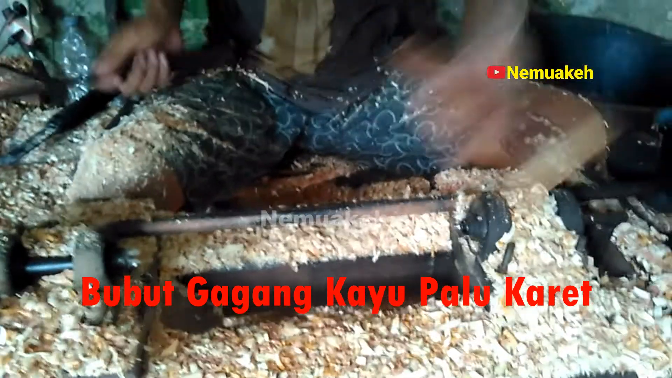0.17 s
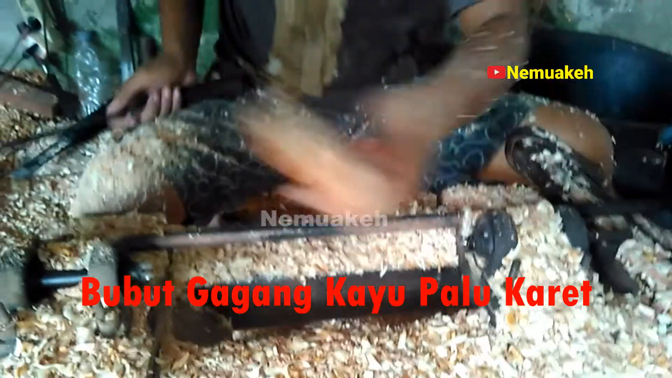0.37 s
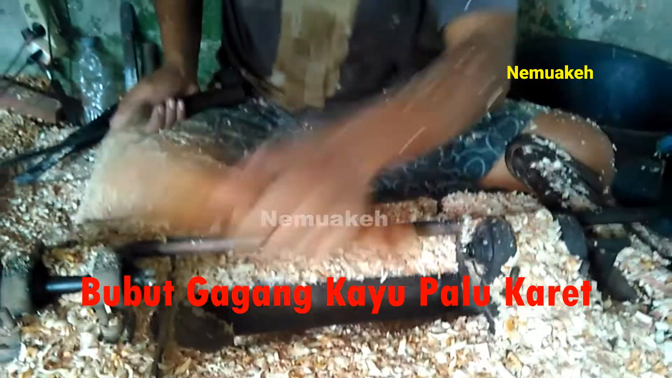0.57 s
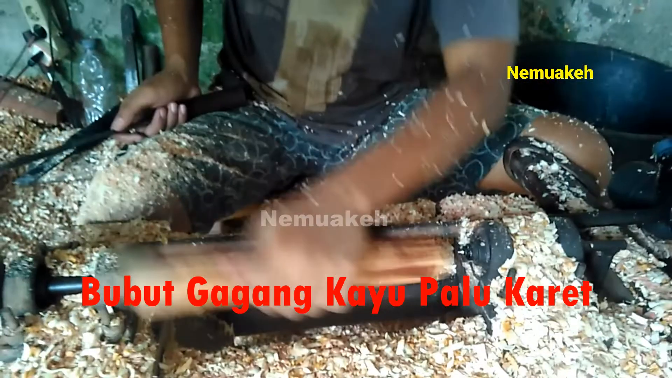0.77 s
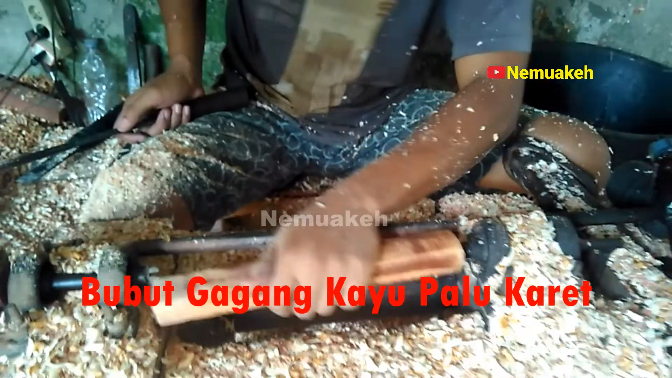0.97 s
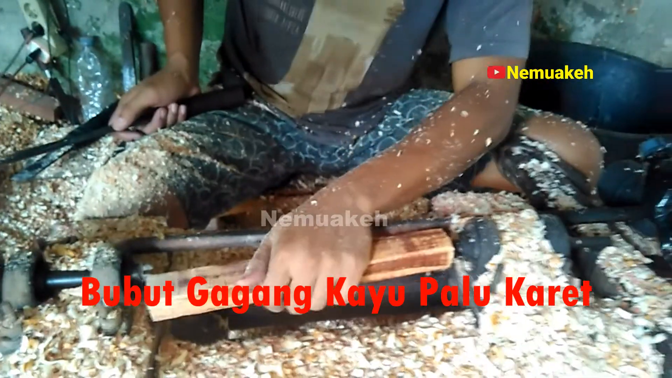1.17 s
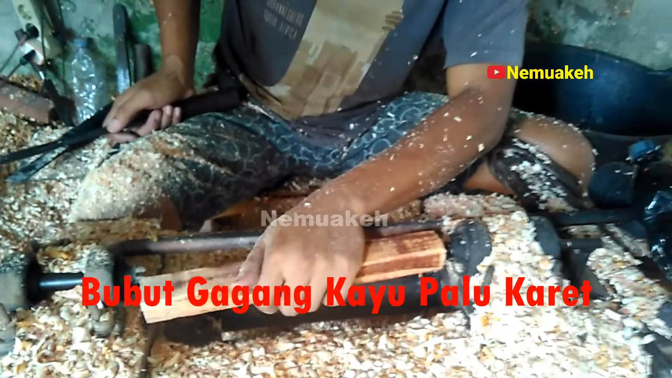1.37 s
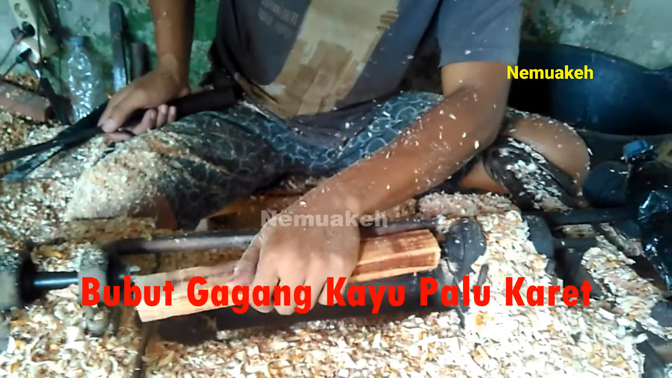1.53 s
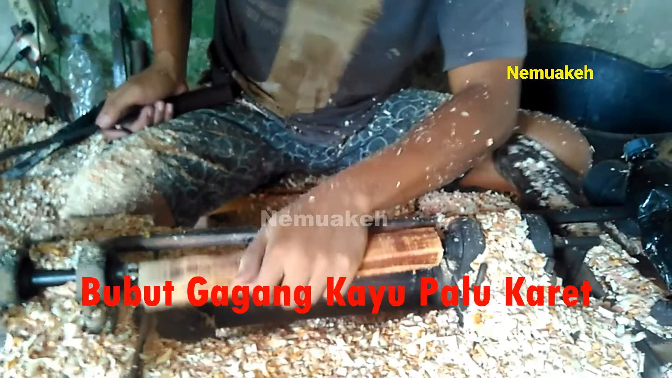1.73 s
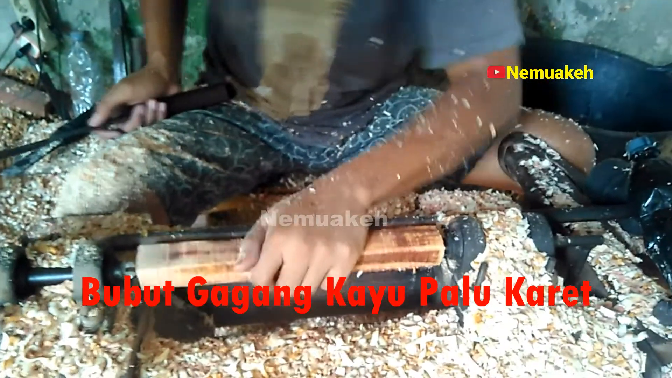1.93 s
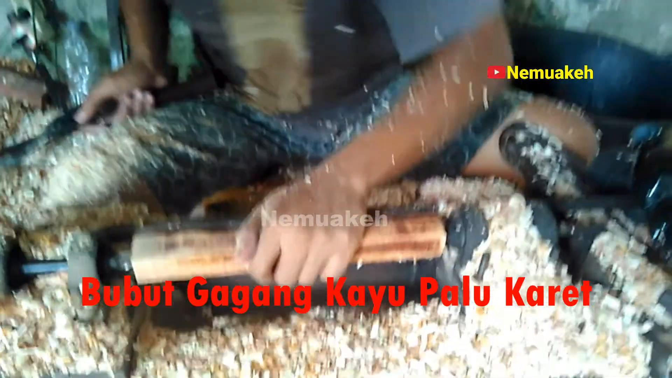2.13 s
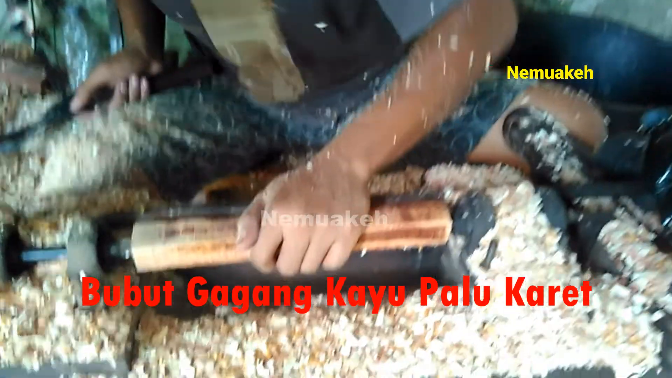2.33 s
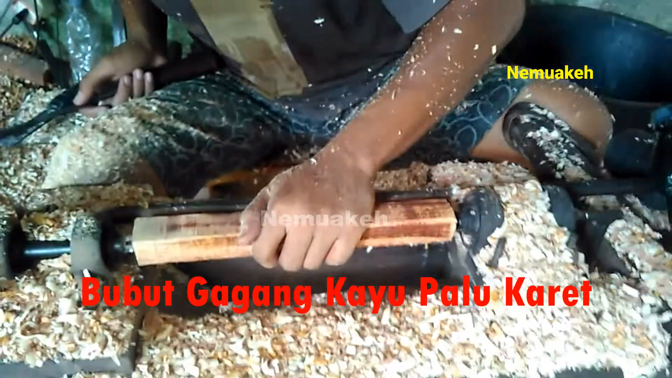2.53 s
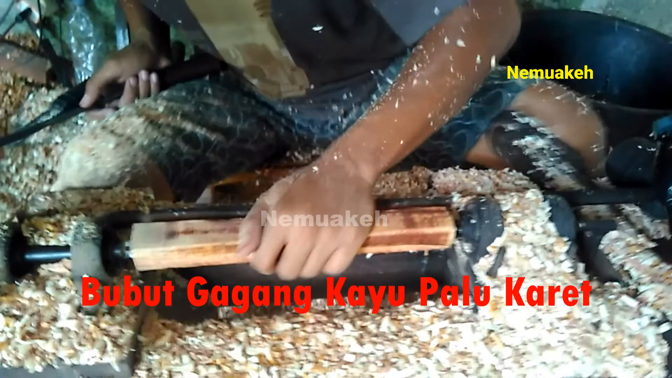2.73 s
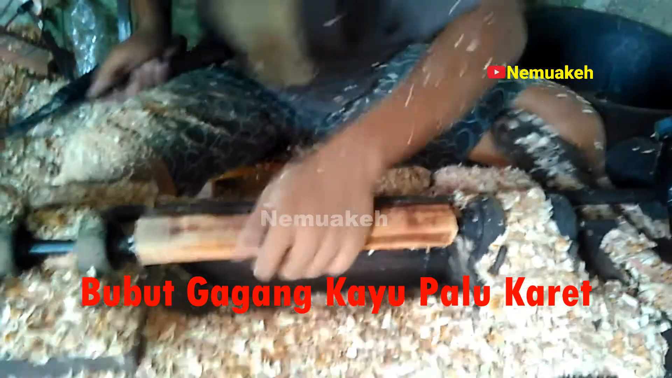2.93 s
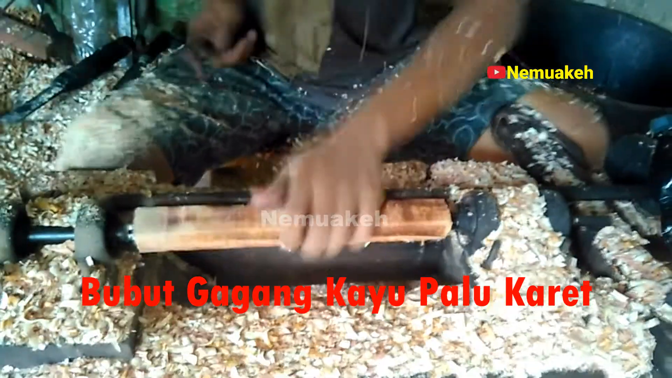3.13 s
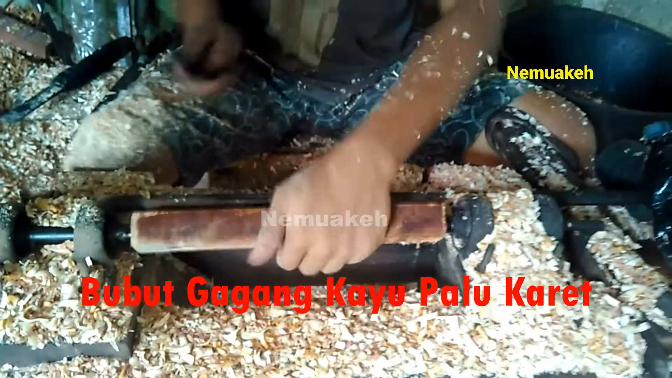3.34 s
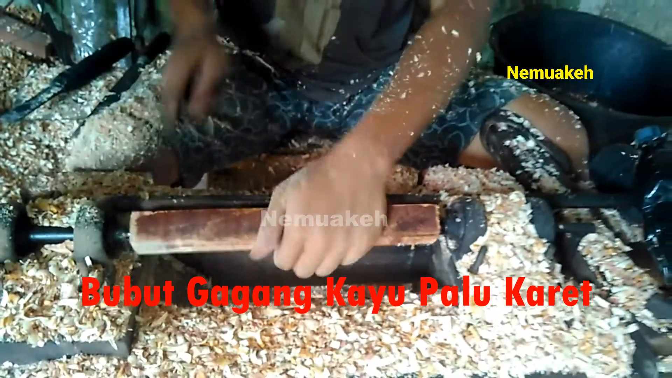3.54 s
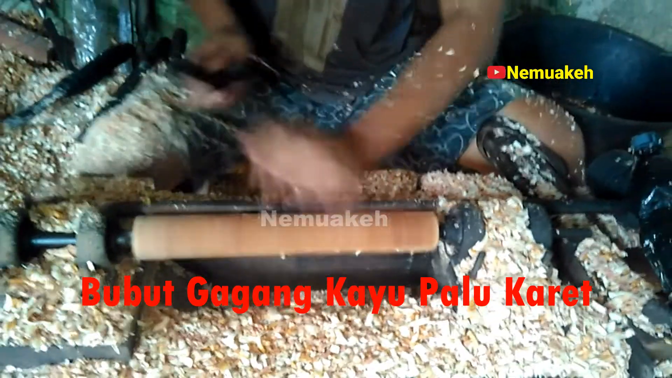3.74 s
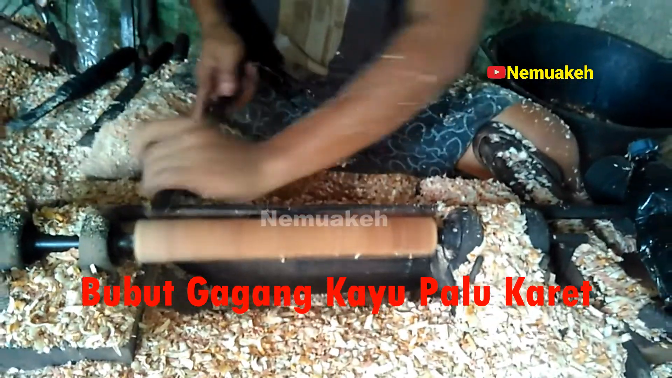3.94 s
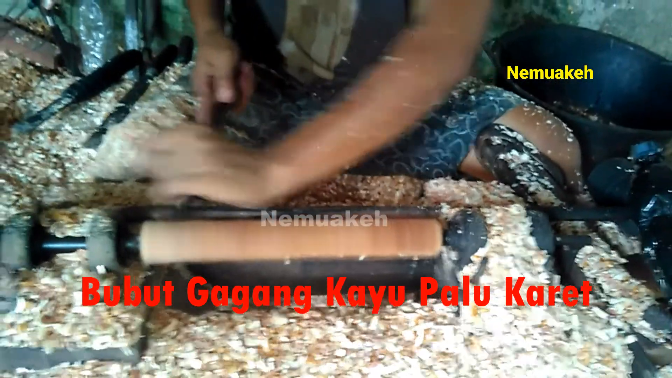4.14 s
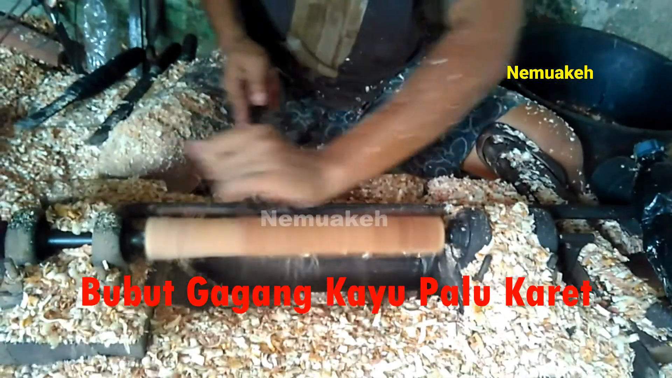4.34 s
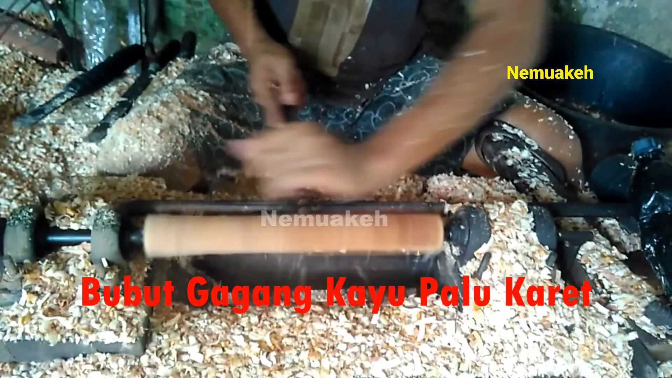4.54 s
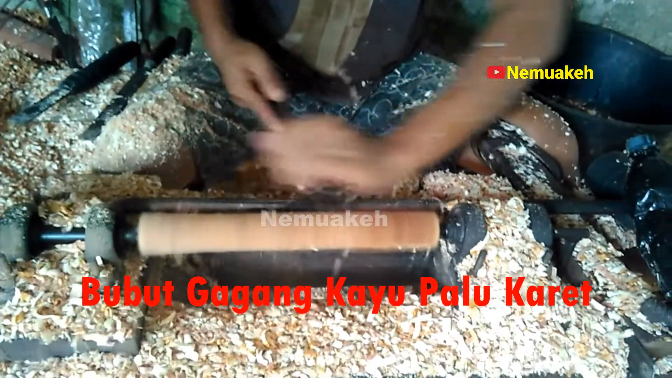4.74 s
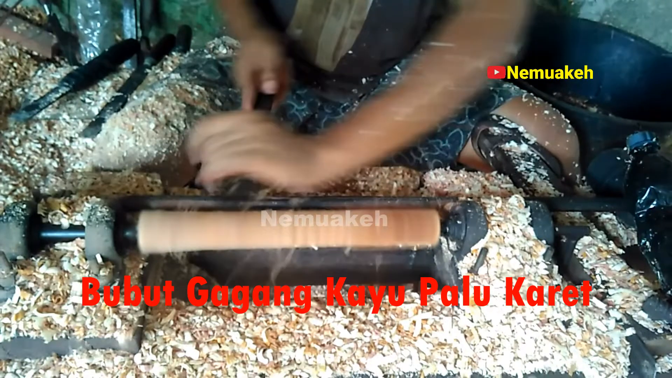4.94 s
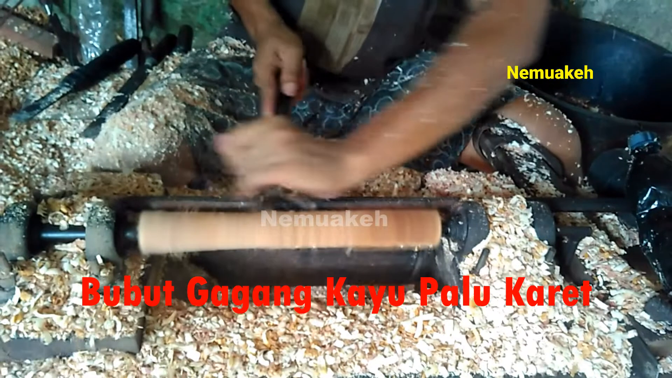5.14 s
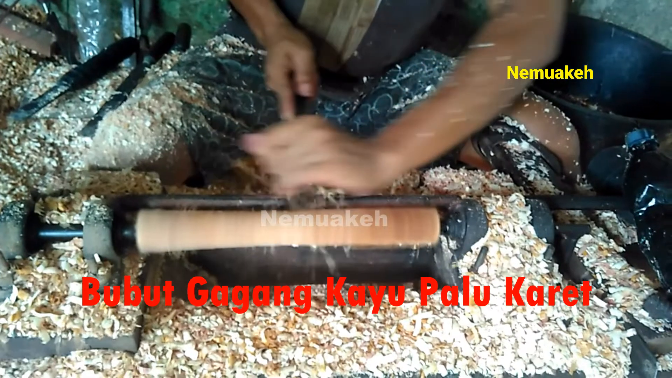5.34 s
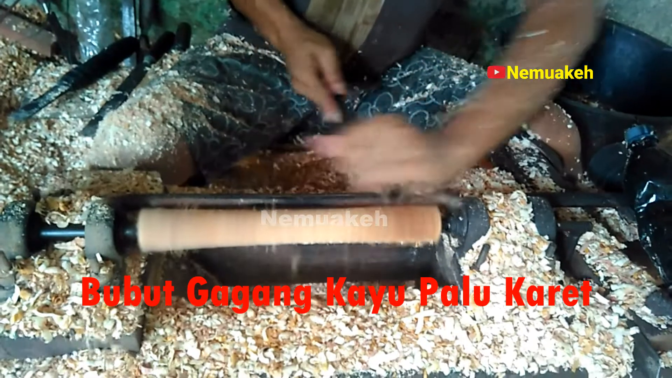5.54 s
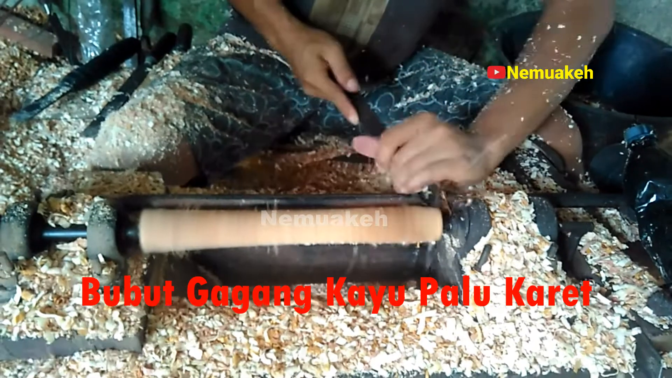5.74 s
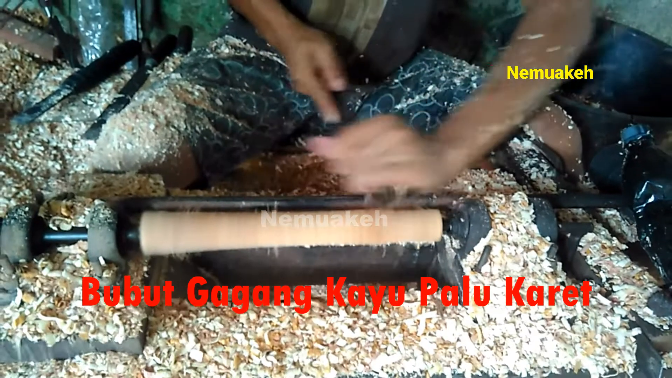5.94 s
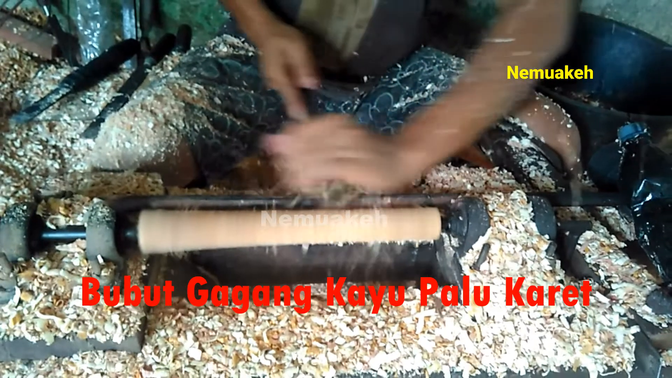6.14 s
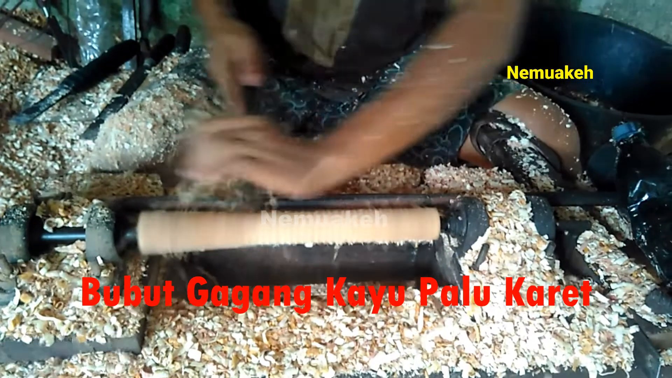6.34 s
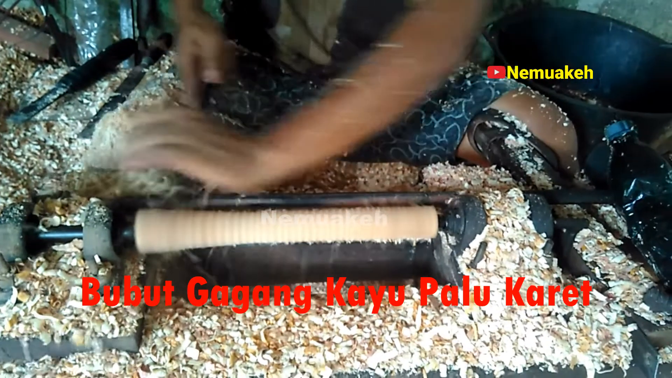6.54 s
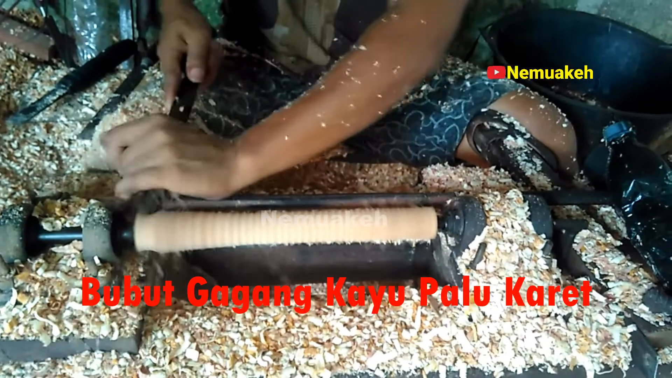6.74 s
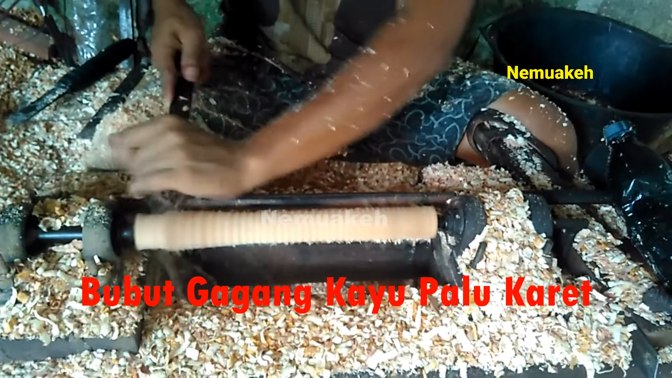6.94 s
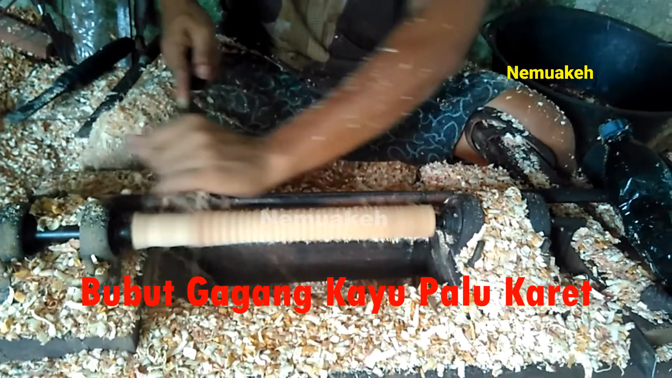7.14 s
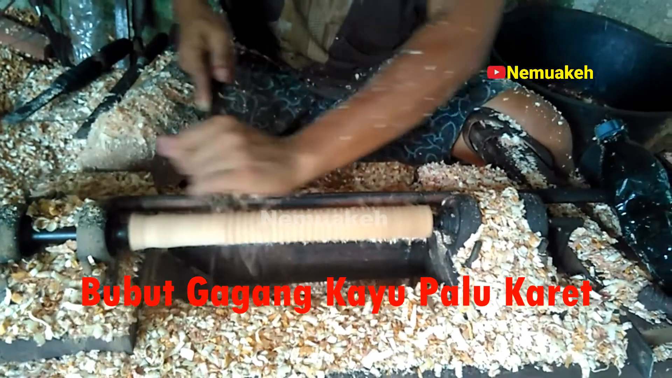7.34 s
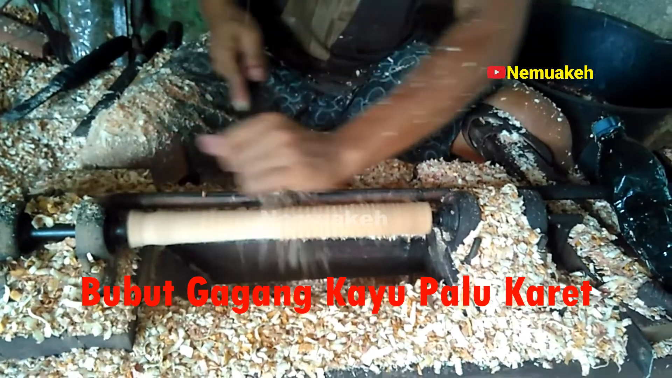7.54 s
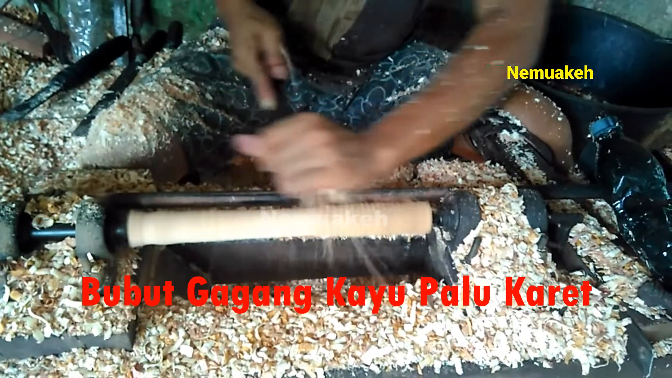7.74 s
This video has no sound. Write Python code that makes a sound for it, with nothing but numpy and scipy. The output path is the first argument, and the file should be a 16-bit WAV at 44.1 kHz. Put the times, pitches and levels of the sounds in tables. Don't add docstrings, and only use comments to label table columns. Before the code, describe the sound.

A small open workshop, miked close, with faint birds in the yard. In the first half second a distant cock crows, low then breaking higher, over a low throb and rustling shavings; small clicks lead to a solid wooden knock at 0.57 s. Until about 2.7 s rising whistles and falling chirps continue among soft taps and ticks. Rustling grows near 3.1 s, a short squeak climbs and drops around 3.3-3.45 s, and hard clacks land at 3.57 s. The motor whirrs up from 3.7 s. At 4.0 s steel touches the wood with a crack, and from 4.17 s a very loud, distorted tearing screech begins. It eases to a rough skim near 4.75 s, bites again at 4.85 and 5.12 s, then runs on with shifting shrill metallic tones. After a brief lighter skim at 6.65-6.75 s and rapid catches, a final stroke grinds from 6.77 s to the end at 8 s.

```python
import sys
import numpy as np
from scipy import signal
from scipy.fft import rfft, irfft, next_fast_len
from scipy.io import wavfile
from scipy.ndimage import uniform_filter1d, map_coordinates

SR = 44100
rng = np.random.default_rng(int(sys.argv[2]) if len(sys.argv) > 2 else 0)


def to_wav(s):
    ch = np.atleast_2d(s).T
    pcm = np.round(np.clip(ch, -1, 1) * 32767)
    wavfile.write(sys.argv[1], SR, pcm.astype(np.int16))


def volts(x):
    e = np.asarray(x, float) / 20
    return 10 ** e


N = 348390
TIME_S = np.arange(N) / SR

# pitch_hz, width_hz, level_db
STEEL = [(4265, 30, -6), (4786, 55, -8), (5163, 35, -11), (5697, 55, -7), (6122, 35, -7), (6675, 45, 0),
         (7170, 30, -9), (7711, 28, -3), (8260, 45, -7), (8820, 45, -5), (9428, 28, -4), (9980, 35, -6),
         (10623, 30, -7), (11205, 35, -6)]
# pitch_hz, width_hz, level_db
REST = [(2640, 70, -14), (3310, 60, -13), (3700, 60, -7), (3990, 50, -14)]
LEAD_DB = {4260: -21.5, 6680: -17}
# centre_s, length_s, pitch_hz, boost_db
SINGS = [(4.2, 0.28, 4786, 9), (5.8, 0.11, 4265, 12), (5.537, 0.073, 4265, 6), (6.072, 0.11, 4265, 5),
         (6.65, 0.078, 4265, 14), (7.046, 0.16, 4265, 12), (4.178, .04, 6675, 17.5),
         (4.462, 0.13, 6675, 17), (4.64, 0.084, 6675, 13), (4.96, 0.11, 6675, 7), (5.174, 0.09, 6675, 8),
         (5.398, 0.13, 6675, 9.5), (5.2, 0.14, 6675, 11), (5.844, 0.12, 6675, 17), (6.786, 0.14, 6675, 12),
         (6.97, 0.086, 6675, 11.5), (5.9, 0.12, 6675, 10), (6.9, 0.11, 6675, 12.5),
         (4.398, 0.11, 7711, 14.5), (4.73, 0.082, 7711, -1), (5.17, 0.065, 7711, 11), (5.1, .1, 7711, 8),
         (5.965, 0.05, 7711, 8), (6.83, 0.044, 7711, 19), (3.6, .1, 8820, 8), (6.58, 0.081, 8820, 14),
         (7.5, 0.24, 9428, 5.5), (6.7, 0.53, 8260, 11), (4.7, .06, 10623, 12), (6.63, 0.12, 10623, 12),
         (6.66, 0.069, 9980, 12), (6.56, 0.17, 11205, 4), (6.66, .06, 8260, 0), (4.7, .1, 9428, 10),
         (6, .1, 8820, 7), (3.1, .06, 8820, 11), (5.72, .06, 8260, 12), (5.71, .08, 9980, 8),
         (5.7, 0.13, 11205, 6), (4.95, 0.12, 11205, 7), (4.72, .1, 5697, 4.5), (4.74, .1, 6122, 8),
         (4.37, .1, 4786, 13), (5.85, 0.21, 4786, 9.5), (5, .1, 5697, 19), (6.85, 0.051, 8820, 10),
         (6.4, .12, 11205, 5.5), (4.97, 0.051, 7711, 7), (6.05, 0.053, 11205, 4), (6.26, .1, 10623, 7)]
# centre_s, length_s, pitch_hz, lost_share
DEAD = [(4.402, .12, 3080, .7), (4.62, 0.19, 3070, .8), (4.904, 0.12, 3030, 1), (5.277, 0.17, 3300, 0.98),
        (5.695, .1, 3300, 0.79), (6.63, .15, 3070, .9), (6.954, 0.27, 3080, .75),
        (7.197, 0.099, 3060, 0.76), (7.5, 0.15, 3080, 0.98), (4.653, 0.42, 4560, 0.85),
        (5.0, .08, 4540, 0.66), (5.33, 0.21, 4500, 0.74), (6.01, .1, 4530, 0.79), (6.6, 0.21, 4550, 0.77),
        (6.951, .3, 4520, 0.37), (4.636, 0.17, 5330, 0.9), (4.8, 0.06, 5370, 1), (5.724, 0.14, 5350, 1),
        (6.904, 0.096, 5320, .6), (7.333, 0.16, 5330, 0.7)]
# time_s, wood_body_db, steel_singing_db
GRIP = [(3.6, -6, -3.5), (4.0, -13, 3), (4.25, -3.5, 0.5), (4.4, -6, -1), (4.52, -12.5, -2),
        (4.7, -11.5, .5), (5.0, -11.5, 0), (5.3, -10.5, -0.5), (5.52, -13.5, -0.5), (5.72, -9, 1),
        (5.95, -11, .5), (6.15, -12.5, -0.5), (6.47, -10.5, -3.5), (6.64, -13.5, -1), (6.85, -8, -2),
        (7.1, -8, -0.5), (7.5, -10, -1.5), (7.9, -6, -3)]
# pitch_hz, density_db
CHIPS = [(120, -16.0), (410, -8.0), (700, -7), (1580, -11.5), (1920, -10.0), (2690, -6.0), (3020, -5.5),
         (3720, -3.0), (4340, -7.0), (4510, -3.0), (4750, -2.5), (9690, -2), (13600, -9.5), (15400, -24)]
# pitch_hz, likeness (-1 to 1)
CUT_ALIKE = [(60, -0.51), (180, -0.25), (550, -0.71), (1650, -0.21), (4970, -0.017), (15000, -0.23)]
# pitch_hz, left_minus_right_db
CUT_BALANCE = [(500, 3.5), (1500, 0), (3000, -2), (6000, -1), (9000, 4), (13000, 4)]
# pitch_hz, width_hz, level_db
TURNING_WOOD = [(1590, 470, -4.5), (2653, 260, -4), (3860, 600, 0.5)]
BITES_S = [4.005, 4.168, 4.846, 5.119, 6.77]
# length_s, bite_cut_db, lift_cut_db, lift_db_per_s
STROKES = [
    (.007, -6.5, -11.5, 243.5),
    (0.55, -12, -7, 121),
    (0.15, -8, -6.5, 263),
    (1.529, -8.5, -8.5, 205),
    (1.23, -10, -7, 206),
]
# centre_s, length_s, dip_db
SLACKS = [(4.237, 0.21, -0.5), (5.755, .055, 2), (5.847, 0.06, 6.5), (6.776, 0.018, 0)]
# time_s, level_db
MOTOR = [
    (3.69, -62),
    (3.72, -42.5),
    (3.99, -36.5),
    (4.03, -28.5),
    (4.2, -24),
    (7.9, -28.5),
]
# pitch_hz, density_db
BED = [(35, -35), (60, 4.5), (164, -9.5), (478, -8.5), (615, 4), (1280, -4.5), (1760, -7), (4180, -1.5),
       (6300, -23), (10900, -6.5), (14000, -58)]
# pitch_hz, width_hz, level_db
BEARING = [(800, 330, -3), (1377, 260, 1.5), (2547, 220, -4)]
# start_s, peak_db, wood_db, t60_s, left_minus_right_db
KNOCKS = [(0.281, -35, -45, .025, 10), (0.343, -31, -45, .025, 14), (0.4544, -28, -45, 0.06, 7),
          (0.5675, -29, -2, 0.028, 9), (0.571, -9, -17, 0.11, 5), (0.8128, -44, 10, 0.15, 6),
          (0.9485, -45, -5, 0.23, 5), (1.2414, -42, -45, .04, 6.0), (1.7285, -34, -24, 0.13, 2),
          (2.2388, -35.5, -24, 0.05, 3), (2.299, -33.5, -26, 0.069, 6), (2.3305, -27, -36, 0.029, 5),
          (1.755, -35, -45, .03, 7), (2.58, -55, 9, 0.18, 3), (2.772, -46, -25, .04, 6),
          (3.06, -41, -6, .04, 7), (3.215, -40, -45, .03, 6), (3.0894, -27.5, -22, 6.0, 6),
          (3.44, -47, -1, 0.11, -1), (3.572, -21, -8, 0.045, 1), (3.5748, -7, -13, 0.035, 10),
          (3.577, 0, -11.5, 0.11, 4), (4.0044, -3.5, -24, 0.12, 8), (4.1682, -7, -11.5, 0.027, 1),
          (4.075, -5, -23, 0.033, 7), (5.08, -12, -25, .02, 2), (6.701, -10, -29, .02, 2),
          (4.15, -10, -29, .03, 2), (4.829, 7.5, -40, 0.042, 6)]
# start_s, peak_db, wood_db, t60_s, left_minus_right_db
CATCHES = [
    (6.719, -4, -25, .02, 2),
    (6.734, 3, -25, .02, 2),
    (6.751, 3, -25, .035, 2),
]
# pitch_hz, width_hz, level_db
BLANK = [(206, 350, -4), (457, 230, 4.5), (713, 150, 8.5), (1090, 690, 0), (1610, 310, 1), (2320, 600, -17),
         (3300, 660, -14)]
# start_s, pitch_hz, level_db, t60_s
RINGS = [(0.571, 1020, -31, 0.075), (.5715, 1230, -29, 0.065), (0.8131, 725, -33.5, 0.081),
         (.8135, 2400, -47, 0.034), (.8135, 3440, -49, .04), (0.814, 639, -39, .08), (.949, 800, -52, .08),
         (.5715, 2570, -36, 0.076), (.5715, 3410, -38, .06), (.5715, 7800, -35, .1),
         (.5715, 11210, -28, 0.098), (3.578, 9200, -23, 0.15), (3.578, 10340, -25, 0.13),
         (3.578, 5150, -23.5, .1), (3.5773, 3230, -27, 0.063)]
# time_s, slip_hz, level_db, octave_db
SQUEAK = [
    (3.29, 758, -70, 12),
    (3.305, 798, -48.5, 3.5),
    (3.35, 986, -40.5, -6),
    (3.357, 1310, -39, -11),
    (3.385, 1280, -33.5, -17),
    (3.39, 980, -52, 6),
    (3.42, 824, -42, -1.5),
    (3.445, 666, -54, 7),
    (3.46, 680, -75, 0),
]
# start_s, length_s, pitch_hz, slide_hz, level_db
WHISTLER = [
    (0.284, 0.34, 2332, 241, -52.5),
    (1.049, 0.28, 2307, 192, -53.5),
    (1.871, 0.29, 2290, 238, -53.5),
    (2.329, 0.116, 2400, -150, -60),
    (2.605, 0.14, 2306, -14, -62),
]
# start_s, length_s, start_hz, end_hz, level_db
TRILLS = [(0.818, 0.26, 5590, 3310, -56.5), (.935, .035, 5750, 5700, -61), (1.057, 0.058, 3450, 3150, -58),
          (1.275, 0.094, 3080, 2970, -60), (1.262, .07, 3900, 3530, -61), (1.497, 0.087, 2980, 2766, -60),
          (1.744, 0.077, 3020, 3005, -56), (2.97, .08, 5250, 5150, -68), (0.294, .12, 5200, 5070, -67),
          (1.192, 0.12, 4150, 3050, -59), (1.406, 0.12, 4400, 3000, -61.5), (1.603, 0.093, 4570, 4260, -63),
          (1.7, 0.056, 3520, 3060, -62), (1.837, 0.062, 2800, 2660, -59), (2.043, .08, 5230, 4900, -73),
          (2.116, 0.044, 3820, 3500, -58), (2.197, 0.097, 4830, 4400, -65), (2.535, .1, 5400, 5080, -64),
          (2.605, 0.062, 4190, 3520, -59), (2.73, 0.07, 4660, 4660, -63)]
# time_s, level_db
AIR = [(0, -44), (.35, -40.5), (1.1, -42.5), (1.5, -48.5), (2.1, -55.5), (2.5, -50), (3.1, -49),
       (3.55, -50), (3.95, -36)]
# centre_s, dip_db
LULLS = [(.17, 22), (.57, 8), (.78, 18), (.97, 12), (1.25, 15), (1.7, 11), (1.9, 6), (2.33, 9), (2.69, 24),
         (2.8, 8), (3.32, 8), (3.63, 13)]
# pitch_hz, density_db
THROB = [(12, -58), (20, -35), (30, -6), (54, 13), (67, 1), (81, -18), (130, -31), (170, -52), (290, -120)]
# peak_s, peak_db
RUSTLE = [(0, -40.5), (.07, -46.5), (.5, -42.5), (1.0, -49), (1.81, -47.5), (2.775, -55), (2.85, -39),
          (3.095, -33.5), (3.17, -33.5), (3.36, -40)]
# pitch_hz, density_db
SHAVINGS = [(470, -42), (800, 0), (914, -3), (1010, -7), (2460, -3.5), (5380, -2), (7190, -2.5),
            (10600, 7.5), (14300, -6.5)]
# pitch_hz, density_db
YARD = [(59, -28), (100, 6), (271, -9), (798, -15), (1430, -26.5), (2300, -23), (2770, -52), (3080, -21),
        (4560, -74), (10300, -43.5), (14300, -23)]
# pitch_hz, likeness (-1 to 1)
ALIKE = [(60, -0.97), (180, -0.81), (550, -0.62), (1650, 0.26), (4970, 0.17), (15000, -0.21)]
# pitch_hz, level_db
WHINE = [(13001, -80), (14002, -75)]
# pitch_hz, width_hz, level_db
SCUFF = [(1280, 370, 0.17), (6800, 330, 1.8)]
# pitch_hz, t60_s
SHED = [(200, 0.3), (2000, 0.27), (10000, 0.11)]
# pitch_hz, ease_db
EASE = [(1200, -60), (1700, -5), (2400, 0), (6500, 0), (8000, -3), (11000, -3), (12500, 0)]

SHAFT_HZ, TOUCH_S = 53.66, 4.005
START_S, START_DB, RUN_UP_DB_PER_S = 3.7, -49.5, 68
SKIM_DB, SKIM_SPAN_DB, SKIP_DB = -21.5, 3.2, 2.5
CROW_S, CROW_BREAK_S, CROW_END_S = 0.091, 0.17, 0.43
CROW_HZ, CROW_SCOOP_HZ, CROW_SCOOP_S, CROW_LOW_DB, CROW_HIGH_DB = 730, 121, .03, -54, -51
WHISTLE_EDGE_S, WARBLE_HZ = 0.039, 91


def chisel():
    cut_db = cut()
    wood_db, sing_db = curves(GRIP)
    wood_db = wood_db + 1.2 * wobble(8)
    sing_db = sing_db + 0.5 * wobble(9.1)

    force = volts(cut_db + 3.0 + 0.62 * np.clip(cut_db + 13.0, 0, None))
    turn_db = 0.3 + SKIP_DB * bump(SKIM_DB, SKIM_SPAN_DB, cut_db)
    force *= volts(turn_db * np.cos(tone(SHAFT_HZ, 7.5)) + 1.3 * wobble(25) + 0.93 * wobble(8))

    soon_db = np.roll(uniform_filter1d(cut_db, size=3000), -3000)
    lifting_db = np.clip(cut_db - soon_db, 0, 12)
    chips = patchy(pair(CHIPS, CUT_ALIKE, grain_db=4.0), depth_db=2.5)
    sound = volts(-.8 * lifting_db - 0.87 * sing_db) * chips

    bite = np.clip((cut_db + 30) / 15, 0, 1)
    blank = filtered(pair([(300, -15), (1000, -7)], CUT_ALIKE, grain_db=2), modes(TURNING_WOOD))
    sound += bite * volts(1.89 * wood_db + 5.5 - 0.32 * lifting_db) * patchy(blank, depth_db=2.0)
    for hz, width, db in REST + STEEL:
        sound += bite * steel_mode(hz, width, db, sing_db)

    for hz in sorted({row[2] for row in DEAD}):
        lost = sum(share * bump(s, 1.3 * length) for s, length, at, share in DEAD if at == hz)
        lost = np.clip(lost * (1 + .4 * wobble(16)), 0, 1)
        sound -= lost * filtered(sound, lambda f: np.abs(resonance(f, hz, 150)) ** 2)

    shallow = np.clip((-11 - cut_db) / 8, 0, .9) * (TIME_S > TOUCH_S)
    sound -= shallow * filtered(sound, lambda f: (f > 170) / (1 + (f / 740) ** 6))
    return force * filtered(sound, lambda hz: volts(along(CUT_BALANCE, hz) * [[.5], [-.5]]))


def steel_mode(hz, width, db, sing_db):
    shake = rng.standard_normal((2, N)) + 0.97 * rng.standard_normal(N)
    ring = unit(filtered(shake, lambda f: resonance(f, hz, 0.62 * width)))
    spread = rng.uniform(-1, 1) * np.array([[1], [-1]])
    ring = .6 * ring + .8 * np.sin(tone(hz, 1.2 * width) + spread)
    lead = min(LEAD_DB, key=lambda k: abs(k - hz))
    if abs(lead - hz) < .02 * hz:
        level_db = LEAD_DB[lead] + 1.6 * wobble(12)
    else:
        level_db = db - 12.5 + sing_db + 1.3 * wobble(15)
    level_db += sum(more * bump(s, length) for s, length, at, more in SINGS if abs(at / hz - 1) < .03)
    return ring * volts(level_db + 1.5 * np.array([wobble(9), wobble(9)]))


def cut():
    run_up = START_DB + RUN_UP_DB_PER_S * (TIME_S - START_S) + ramps(START_S, 9, 300, 1)
    layers = [np.where(TIME_S < TOUCH_S, run_up, SKIM_DB)]
    for s, (length, in_db, out_db, lift) in zip(BITES_S, STROKES):
        depth_db = np.interp(TIME_S, [s, s + length], [in_db, out_db])
        layers.append(depth_db + ramps(s, s + length, 6000, lift))
    return np.max(layers, axis=0) - sum(db * bump(s, length) for s, length, db in SLACKS)


def motor():
    beat = volts(4 * np.cos(tone(2 * SHAFT_HZ, 30)) + 2 * wobble(60))
    bearing = unit(filtered(beat * pair([(1000, 0)], CUT_ALIKE, grain_db=0.5), modes(BEARING)))
    bed = unit(beat ** .6 * pair(BED, CUT_ALIKE, grain_db=1))
    early_db = ramps(0, 3.68, 1, 22)
    bed_gain = volts(-7.5 - 0.81 * np.clip(early_db, -6, 0))
    bearing_gain = volts(0.5 + np.clip(early_db, -5, 0))
    return volts(curves(MOTOR, -120)[0] + 7.5) * (bed_gain * bed + bearing_gain * bearing)


def knocks():
    crack, tick, wood = np.zeros((3, 2, N + SR))
    push = np.zeros((2, N))
    t = np.arange(SR // 3) / SR
    for s, db, wood_db, t60, pan_db in KNOCKS + CATCHES:
        at = round(s * SR)
        span = slice(at, at + len(t))
        side = volts([[pan_db / 2], [-pan_db / 2]])
        fade = volts(db - 60 * t / np.clip(t60, .02, .12)) * np.clip(t / 0.0018, 0, 1)
        fade *= 1 + 3.44 * volts(-60 * t / 0.016)
        bright = tick if wood_db < -36 else crack
        bright[:, span] += side * fade * volts(-8.5) * rng.standard_normal((2, len(t)))
        dull = rng.standard_normal(len(t)) + 1.48 * rng.standard_normal((2, len(t)))
        wood[:, span] += side * fade * volts(wood_db + 2.0 - 60 * t / 0.059) * [[1], [-1]] * dull
        push[:, at] = side[:, 0] * volts(db + wood_db + 33) * (wood_db > -9)
    tick = filtered(tick[:, :N], lambda f: resonance(f, 9800, 5800) ** 2)
    hollow = filtered(push, lambda f: resonance(f, 700, 130) ** 2)
    crack = filtered(crack[:, :N], modes([(2930, 2000, -2), (5160, 1100, -2.5), (9800, 3300, -1.5)]))
    return rings() * volts([[3], [-3]]) + hollow + tick + crack + filtered(wood[:, :N], modes(BLANK))


def rings():
    total = np.zeros(N)
    for s, hz, db, t60 in RINGS:
        fade = volts(db - 60 * np.clip(TIME_S - s, 0, None) / t60)
        total += (TIME_S > s) * fade * np.sin(tone(hz, 26.6))
    return total


def squeak():
    hz, _, octave_db = curves(SQUEAK)
    phase = tone(hz, 44.4)
    stack = np.sin(phase) + volts(octave_db) * (np.sin(2 * phase) + 0.27 * np.sin(3 * phase))
    scrape = unit(filtered(rng.standard_normal(N), modes([(1340, 1200, 13), (2800, 760, -23)])))
    return volts(curves(SQUEAK, -120)[1] + 2.9 * wobble(200)) * (stack + 0.35 * scrape)


def birds():
    return whistler() + crow() + trills()


def whistler():
    song, edge = np.zeros(N), 20 / WHISTLE_EDGE_S
    for s, length, hz, slide_hz, db in WHISTLER:
        late = np.clip((TIME_S - s) / length, 0, 1) ** 1.4
        level_db = db + ramps(s + WHISTLE_EDGE_S, s + length - WHISTLE_EDGE_S, edge, edge)
        level_db += 3.6 * wobble(39.56)
        blur_hz = 20 + WARBLE_HZ * late * (slide_hz > 0)
        song += volts(level_db) * np.sin(tone(hz + slide_hz * late, blur_hz))
    return song


def crow():
    scoop = np.exp(-np.clip(TIME_S - CROW_S, 0, None) / CROW_SCOOP_S)
    phase = tone(CROW_HZ - CROW_SCOOP_HZ * scoop, 5.5)
    low_db = CROW_LOW_DB + ramps(CROW_S + 0.02, CROW_S + 0.037, 700, 300)
    high_db = CROW_HIGH_DB + ramps(CROW_BREAK_S + 0.023, CROW_END_S, 600, 60) + 2.8 * wobble(14.6)
    return volts(low_db) * np.sin(phase) + volts(high_db) * np.sin(2 * phase)


def trills():
    song = np.zeros(N + SR)
    for s, length, start_hz, end_hz, db in TRILLS:
        u = np.arange(int(length * SR)) / (length * SR)
        bend = (4900 / start_hz) ** 2.8
        hz = end_hz + (start_hz - end_hz) * (1 - u) ** bend + 50 * np.sin(2 * np.pi * 60 * u * length)
        level = volts(db + 3.9 * np.sin(2 * np.pi * 30 * u * length)) * np.sin(np.pi * u) ** .5
        song[int(s * SR):][:len(u)] += level * np.sin(2 * np.pi * np.cumsum(hz) / SR)
    return song[:N]


def background():
    throb_db = curves(AIR)[0] + 7.0 + 1.2 * wobble(9.15) + ramps(0, 3.87, 1, 56)
    throb_db -= sum(db * bump(s, 0.044) for s, db in LULLS)
    hum = 1.07 * np.sin(tone(51, 5.4)) * [[1], [-1]]
    throb = volts(throb_db) * (pair(THROB, ALIKE, grain_db=-1.5) + hum)

    stir_db = np.max([db + ramps(s, s, 160, 108) for s, db in RUSTLE], axis=0)
    rustle_db = np.maximum(stir_db, -55) - 5.5 + 0.43 * wobble(44.0) + 0.67 * wobble(7.5)
    rustle = volts(rustle_db) * patchy(pair(SHAVINGS, ALIKE, grain_db=1.0), depth_db=3.5)

    yard = volts(-55.5 + 0.2 * wobble(5.1)) * pair(YARD, ALIKE, grain_db=-1)
    whine = sum(volts(db + 3 * wobble(6)) * np.sin(tone(hz, 4.9)) for hz, db in WHINE)
    scuff = unit(filtered(rng.standard_normal((2, N)), modes(SCUFF)))
    scuff = scuff * volts(-54 + ramps(0, 0.045, 1, 69))
    return (scuff + throb + rustle + yard + whine) * volts([[3], [-4]])


def shed(x, stretch):
    hz, t, z = signal.stft(rng.standard_normal((2, SR)), SR, nperseg=256)
    fade = volts(-60 * t / (stretch * along(SHED, hz)[:, None]))
    tail = signal.istft(z * fade, SR, nperseg=256)[1]
    return signal.fftconvolve(x * np.ones((2, 1)), tail / np.linalg.norm(tail[0]), axes=1)[:, :N]


def unit(x):
    return x / np.sqrt(np.mean(x ** 2) + 1e-20)


def along(points, hz):
    f, v = np.transpose(points)
    return np.interp(np.log(hz + 1), np.log(f + 1), v)


def curves(rows, outside=None):
    s, *cols = np.transpose(rows)
    return [np.interp(TIME_S, s, c, outside, outside) for c in cols]


def ramps(start, end, rise, fall):
    return np.minimum(0, np.minimum(rise * (TIME_S - start), fall * (end - TIME_S)))


def bump(centre, width, axis=TIME_S):
    return np.exp(-(2 * (axis - centre) / width) ** 2)


def wobble(rate):
    knots = rng.standard_normal(int(N * rate / SR) + 4)
    return map_coordinates(knots, [np.arange(N) * rate / SR], order=1)


def tone(hz, blur_hz):
    return 2 * np.pi * np.cumsum(hz + blur_hz * wobble(150)) / SR


def filtered(x, response):
    m = next_fast_len(N + 8192)
    return irfft(rfft(x, m) * response(np.fft.rfftfreq(m, 1 / SR)), m)[..., :N]


def resonance(f, hz, width):
    return 1j * f * width / (hz * hz - f * f + 1j * f * width)


def modes(peaks):
    return lambda f: sum((-1) ** k * volts(db) * resonance(f, c, w) for k, (c, w, db) in enumerate(peaks))


def pair(spectrum, alike, grain_db):
    def mid_side(hz):
        turn = np.arccos(np.clip(along(alike, hz), -1, 1)) / 2
        return volts(along(spectrum, hz)) * [np.cos(turn), np.sin(turn)]

    two = rng.standard_normal((2, N)) * volts(grain_db * wobble(900))
    mid, side = filtered(two, mid_side)
    return unit(np.array([mid + side, mid - side]))


def patchy(x, depth_db):
    z = signal.stft(x, nperseg=512)[2]
    field = uniform_filter1d(rng.standard_normal(z.shape[1:]), size=3, axis=0)
    field = uniform_filter1d(field, size=15, axis=1)
    return unit(signal.istft(z * volts(depth_db * unit(field)), nperseg=512)[1][:, :N])


def thinned(x, drop_db):
    hz, _, z = signal.stft(x, SR, nperseg=1536)
    power = (np.abs(z[:, :768]) ** 2).mean(axis=0).reshape(128, 6, -1).mean(axis=1) + 1e-20
    around = uniform_filter1d(power ** .3, size=9, axis=0) ** (1 / .3)
    ease_db = along(EASE, hz[:768:6])[:, None]
    limit = volts(2 * (drop_db + ease_db + 1.2 * rng.standard_normal(power.shape)))
    treble = power[10:].sum(axis=0)
    steady = treble < 3 * np.roll(treble, 1)
    gain = np.where((power < limit * around) & steady, .1, 1)
    z[:, :768] *= np.repeat(gain, 6, axis=0)
    return signal.istft(z * (hz < 14260)[:, None], SR, nperseg=1536)[1][:, :N]


def scene():
    near = knocks() + squeak() * volts([[2], [-3]])
    far = birds()
    wet = shed(volts(-7.5) * near, stretch=0.64) + shed(far * volts([[2], [-4]]), stretch=1.9)
    return chisel() + motor() + near + far * volts([[-3], [-9]]) + wet + background()


def low_pass(x):
    return signal.sosfilt(signal.butter(12, 15590, fs=SR, output="sos"), x)


def record(dry):
    x = dry / (1 + np.abs(dry / 1.3) ** 8) ** (1 / 8)
    x = filtered(x, lambda hz: volts(along([(20, 1.5), (45, 0)], hz)))
    x = np.clip(thinned(x, drop_db=-2.5), -0.99, 0.99)
    return low_pass(x)


dry = scene()
out = record(dry)
to_wav(out)
```